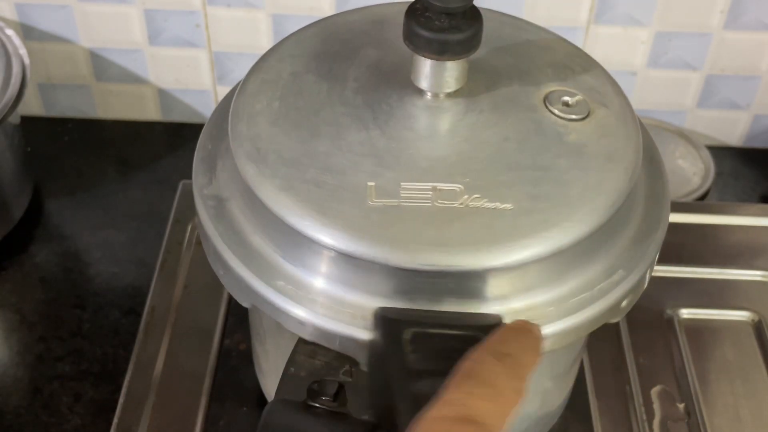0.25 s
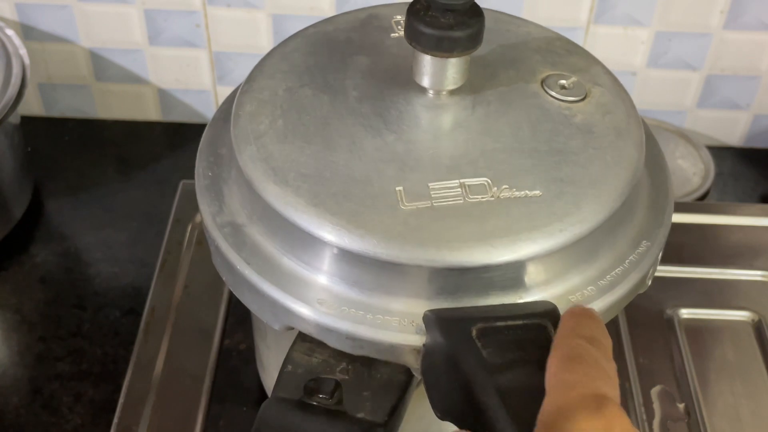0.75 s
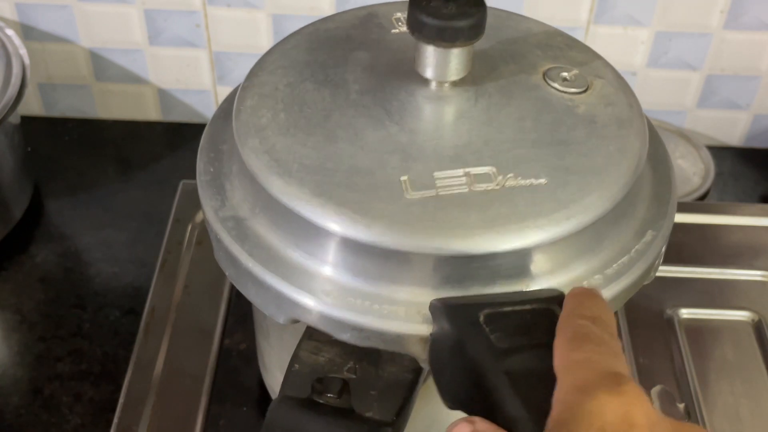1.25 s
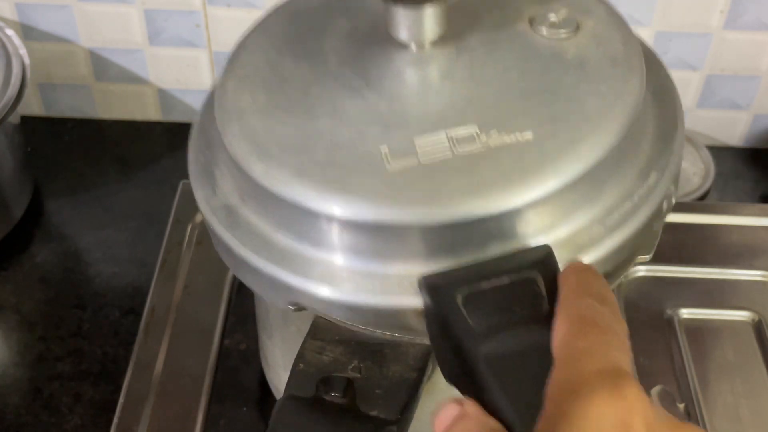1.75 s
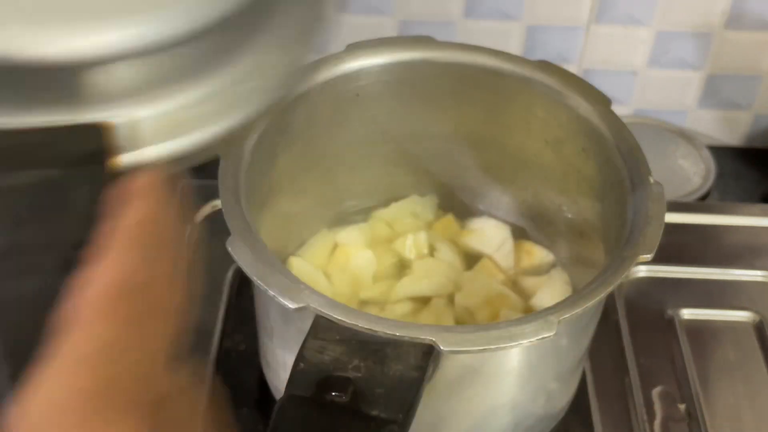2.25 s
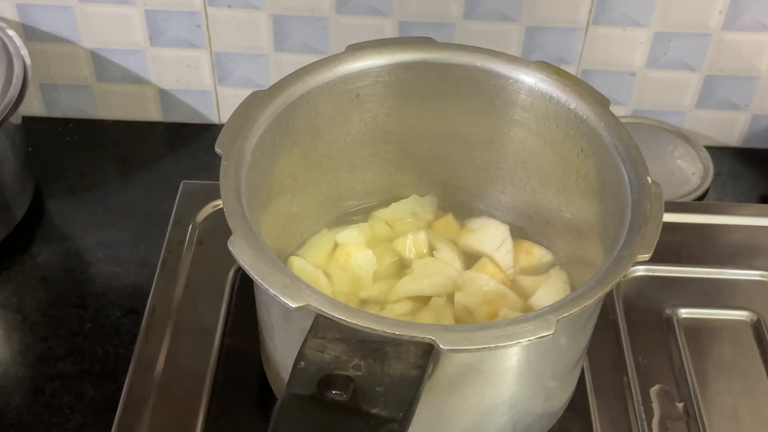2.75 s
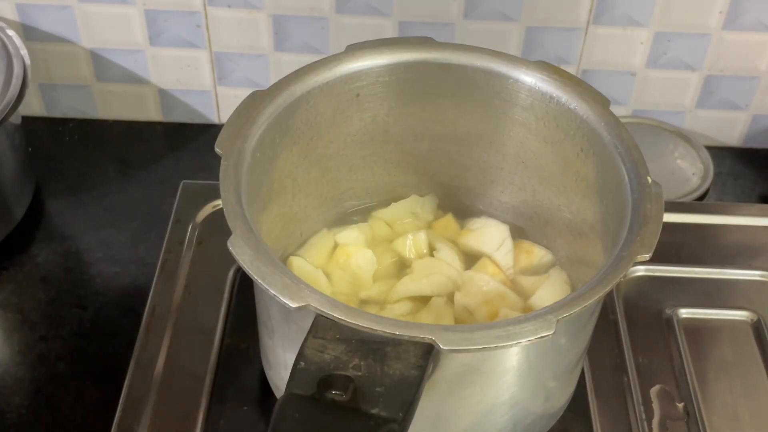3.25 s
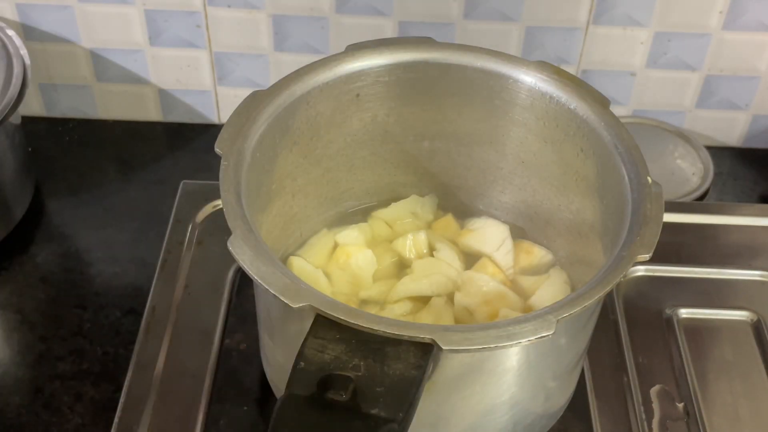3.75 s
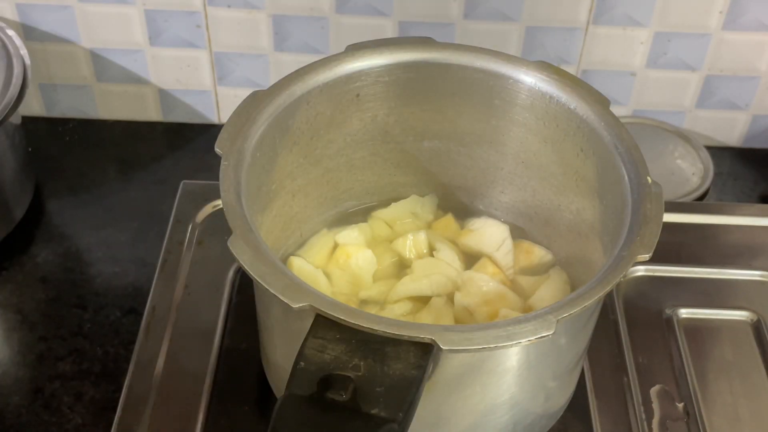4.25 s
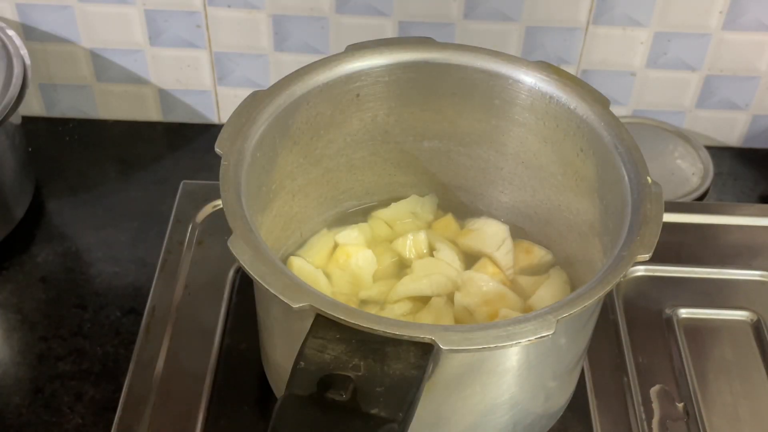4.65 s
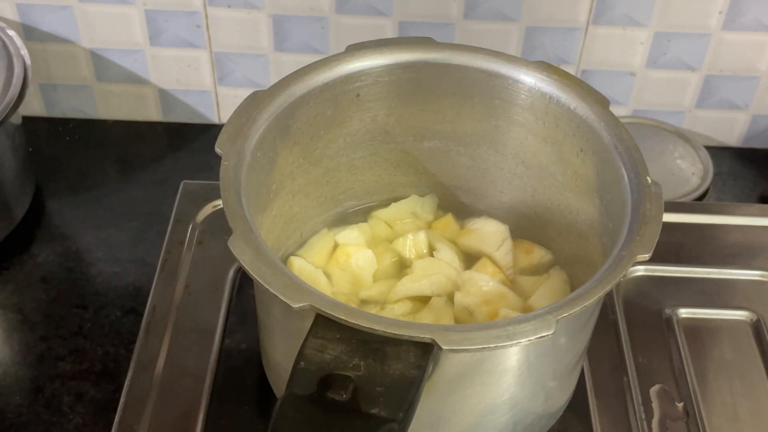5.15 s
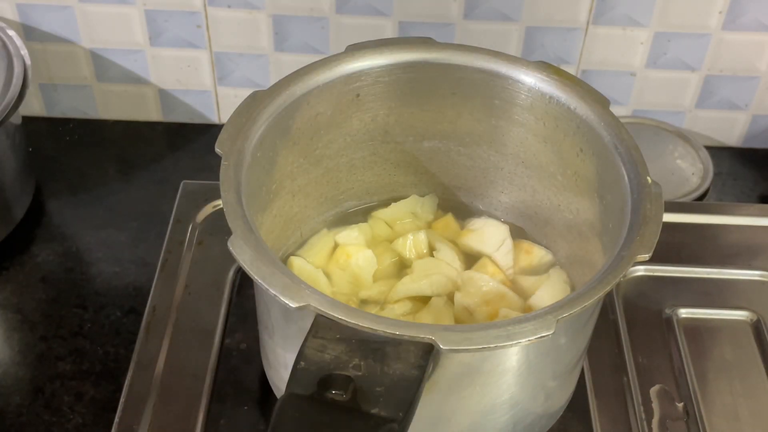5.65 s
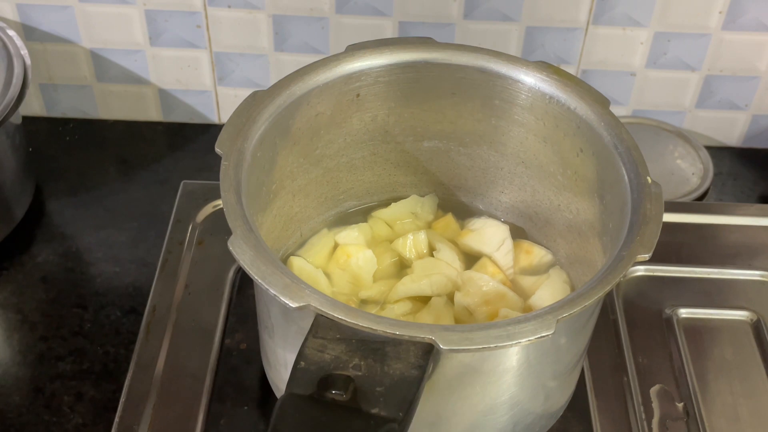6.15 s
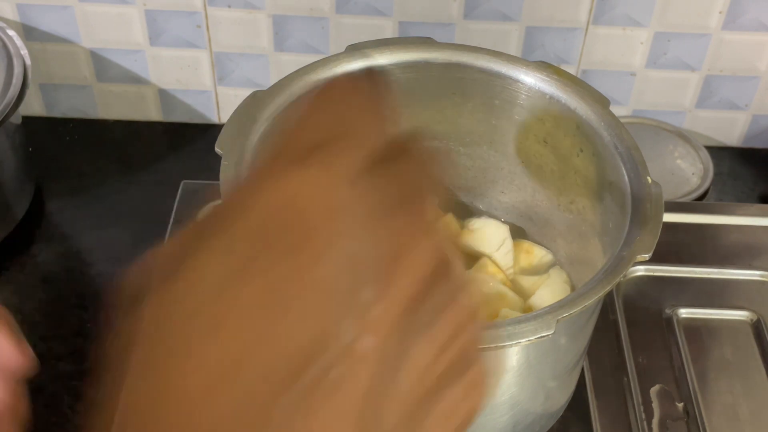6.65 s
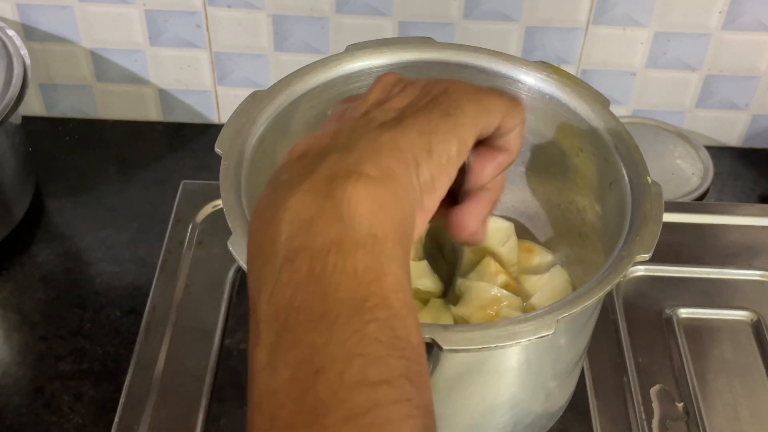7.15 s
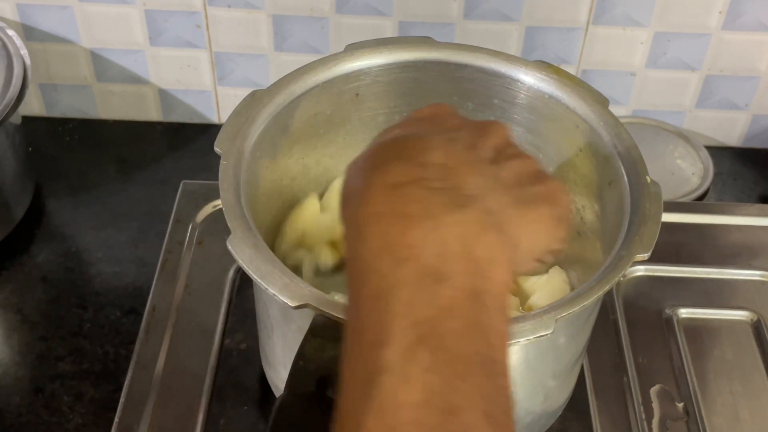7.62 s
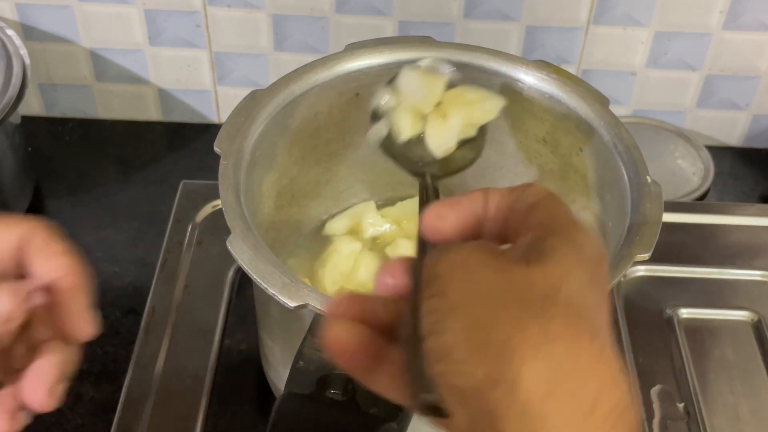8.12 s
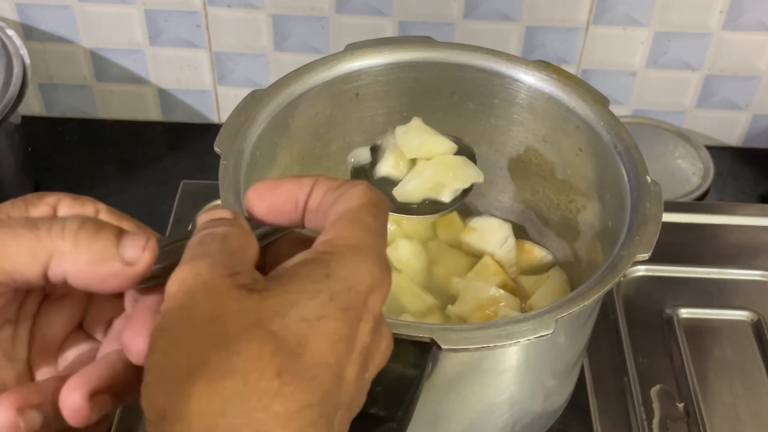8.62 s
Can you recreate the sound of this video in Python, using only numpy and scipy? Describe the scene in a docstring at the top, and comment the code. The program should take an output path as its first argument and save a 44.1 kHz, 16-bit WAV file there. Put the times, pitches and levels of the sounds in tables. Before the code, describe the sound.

Hollow thumps and sharp clicks of an aluminium lid, ringing clanks as it is set aside, then a spoon scraping up a pot wall.

```python
"""The aluminium lid of a pressure cooker clicks and thumps as it is twisted loose in a tiled kitchen.
It is lifted off, carried away and set down with a clatter. A steel spoon is then picked up with a clink,
knocks in the pot and scrapes up its wall. A blow is one impact plus chatter that rings the metal and the room,
a scrape is a dense run of tiny impacts, and a thump is a fading tone of the air under the lid.
Steady kitchen noise, soft low bumps and a thin hiss lie underneath."""
import sys
import numpy as np
from scipy import signal
from scipy.fft import rfft, irfft
from scipy.io import wavfile

SR = 44100
rng = np.random.default_rng(int(sys.argv[2]) if len(sys.argv) > 2 else 0)


def unload_audio(sound):
    """Save the sound as a 16-bit wav file, at the path given as the first command line argument."""
    columns = np.transpose(np.atleast_2d(sound))
    # keep every value between -1 and 1, then stretch to whole-number steps
    steps = np.round(np.clip(columns, -1, 1) * 32767)
    wavfile.write(sys.argv[1], SR, steps.astype(np.int16))


N = 391695
TIME = np.arange(N) / SR  # seconds into the scene
AGE = np.arange(int(.8 * SR)) / SR  # seconds since one sound began
ATTACK = int(.02 * SR)  # samples at the start of a blow over which its level is set

# edges of the five tone bands, thud, knock, clang, ting and sparkle: [edge_hz]
BAND_EDGES_HZ = (150, 500, 1900, 3700, 7800, 15000)

# In the four blow tables level_db is the clang, and knock_db is the knock relative to it.
# the lugs catch as the lid is twisted loose: [start_s, level_db, knock_db, chatter_s]
LID_CLICKS = [(0.064, -54, -9, 0.0024), (0.258, -49, 1, 0.0021), (0.438, -57, 10.5, 0.024),
              (0.524, -33, 2.5, 0.00069), (0.747, -61, 6.5, 0.048), (0.795, -49.5, 3, .012),
              (0.811, -34, 6, 0.0049), (0.826, -30.5, 1.5, 0.0081), (0.8385, -30.5, -29, 0.0059),
              (1.272, -53.5, 2, 0.041), (1.302, -45, 4.5, 0.011), (1.33, -52, 7, .008),
              (1.354, -44, -6, 0.0057), (1.375, -43, -3, 0.0015), (1.408, -48.5, 4, 0.0045),
              (1.469, -32.5, -13, 0.013), (1.551, -58.5, 4, 0.0023), (1.583, -63, 9.5, 0.0061),
              (1.717, -36, -11.5, 0.0045), (1.745, -47.5, 7.5, 0.0066), (1.762, -43.5, 3.5, 0.0014),
              (2.036, -76.5, 26, 0.039), (2.095, -43, -4, 0.0086)]
# the loose lid clanks as it is put down: [start_s, level_db, knock_db, chatter_s]
LID_CLANKS = [(2.549, -50.5, -3, 0.0017), (2.603, -47.5, -15.5, .005), (2.638, -45, -22.5, 0.0031),
              (2.646, -29.5, -24, 0.013), (2.665, -28, -21.5, 0.0059), (3.455, -56.5, -2, .012),
              (3.464, -40, -27, .0015), (3.474, -40, -26, .002), (3.58, -49.5, -14.5, 0.03),
              (3.918, -60.5, -6, 0.015), (4.01, -36.5, -11.5, 0.064), (4.095, -45.5, -11.5, 0.029),
              (4.192, -38, -12, 0.038), (4.294, -34, -2, 0.034), (4.313, -31.5, -13.5, 0.016),
              (4.392, -38.5, -11, 0.0023), (4.661, -35, -2.5, 0.0018)]
# the spoon clinks as it is picked up: [start_s, level_db, knock_db, chatter_s]
SPOON_CLINKS = [(4.881, -36, 3, 0.00096)]
# knocks against the food-damped pot: [start_s, level_db, knock_db, chatter_s]
POT_KNOCKS = [(6.852, -68.5, -0.5, 0.0011), (6.998, -48, 12, 0.0022), (7.222, -59.5, 8.5, 0.02),
              (7.313, -55, 9.5, 0.0012), (7.459, -54, 10, 0.019)]

# colour of each kind of blow: [thud_relative_to_knock_db, ting_relative_to_clang_db]
CLICK_COLOUR = (-4.3, -7.5)
CLANK_COLOUR = (-4.5, -4.5)
SPOON_COLOUR = (-19.5, -10.5)
POT_COLOUR = (-11, 3.45)
# sparkle relative to the ting: fades as the lid is twisted, brighter once it is loose: [time_s, level_db]
SPARKLE = [(.5, -10), (2.1, -21), (2.65, -10), (3.46, -8), (4.3, -5), (4.66, -0.5), (4.88, -7.5), (7, -2)]
# a blow above the medium level gains ting, one below it loses ting
MEDIUM_BLOW_DB, TING_PER_DB = -43.5, 0.418

# hollow thumps of the lid on its seal: [start_s, pitch_hz, peak_db, fade_by_60_db_s]
THUMPS = [(.811, 293.6, -22, 0.15), (.825, 197, -15, 0.1), (1.29, 320, -31.5, 0.12),
          (1.301, 213, -27.5, 0.049), (1.401, 263, -30.5, 0.085), (1.579, 245, -36, 0.1),
          (1.735, 306, -32.5, 0.13), (1.761, 437, -32, 0.19), (2.036, 232, -37, 0.23),
          (2.095, 398.7, -44.5, 0.087)]
THUMP_SWELL_S = 0.0024

# the lid drags over its resting place: [peak_time_s, peak_db, rise_by_20_db_s]
LID_DRAGS = [(4.36, -48, 0.069), (4.65, -51, 0.39)]
# the spoon digs in, then runs up the wall: [peak_time_s, peak_db, rise_by_20_db_s]
SPOON_SCRAPES = [(7.42, -44, 0.11), (7.675, -21, 0.093)]
DRAG_FALL_S, SCRAPE_FALL_S = 0.065, 0.043  # time to fall by 20 dB
# colour of each slide: [thud_db, knock_db, clang_db, ting_db]
DRAG_COLOUR = (-1.5, 2.5, -10, -14)
SCRAPE_COLOUR = (-22.5, -7.5, -7.5, -7.5)

# blows that land where one mode sings out: [start_s, pitch_hz, width_hz, peak_db, fade_by_60_db_s]
SINGING = [(.826, 1026, 61, -26.5, 0.097), (.826, 4520, 30, -48.5, 0.39), (2.665, 4470, 30, -39, 0.47),
           (2.665, 6694, 70.1, -27.5, 0.11), (2.665, 2960, 90.5, -28, 0.26),
           (3.464, 4460, 300, -25.5, 0.067), (3.474, 3366, 71, -25.5, 0.18), (3.58, 2300, 150, -43, 0.55),
           (4.01, 6060, 110, -37.5, 0.88), (4.325, 2160, 92, -18.5, 0.093), (4.325, 667, 40, -33.5, 0.14),
           (4.661, 817, 70, -26.5, 0.13), (4.881, 4530, 119, -36, 0.3), (7.678, 2123, 50, -32, 0.47),
           (7.678, 907, 30, -45.5, 0.22)]

# pitches at which each metal body rings: [pitch_hz, level_db]
LID_MODES = [(659, -6), (780, -4), (870, -4), (1006, -1), (1508, -7), (2113, -5), (2180, -6), (2256, -6),
             (2498, -7), (2579, -3), (2934, -2), (2972, -3), (3330, -3), (3370, -3), (3416, -7), (3962, -8),
             (4433, -8), (4505, -1), (5195, -5), (5984, 0), (6075, -8), (6422, -8), (6589, -3), (6637, -2),
             (6909, -7), (7313, -4), (7666, -7), (7948, -5), (9189, -4), (11313, -3), (12217, -3),
             (12874, -6)]
SPOON_MODES = [(1340, -4), (1723, 0), (1760, 0), (2047, -3), (2221, -2), (2326, -4), (2713, -5), (4409, -3),
               (4506, 0), (4613, -1), (7704, -5), (7940, -4)]
POT_MODES = [(260, -10), (530, -16), (724, -8), (945, -2), (1200, -14), (1507, -3), (2091, -11), (2134, -5),
             (2172, -9), (2272, -5), (2705, -11), (2945, -10), (3200, -11), (3720, -12), (4145, -3),
             (4196, -6), (4430, -5), (4910, -7), (5408, -14), (5467, -12)]

# the lid is carried away from the pot: [time_s, distance_m]
LID_DISTANCE = [(1.7, 0.17), (2.65, 0.37), (3.45, 0.61), (4.66, 0.69)]
ECHO_RADIUS_M = 0.63  # distance at which the lid's share of echo is 0 dB
# further shares of the echo: the metal's direct ring, and what it radiates in other directions
RING_ECHO_DB, SCATTER_DB = -6, 2

# colour of the steady kitchen noise: [pitch_hz, level_per_hz_db]
KITCHEN_COLOUR = [(53, -27.5), (90, -3), (135, -2.5), (262, 1.5), (366, -8.5), (448, -6), (751, -12),
                  (1050, -12.5), (1330, -19), (1850, -15.5), (3110, -28), (4670, -26.5), (7400, -33.5),
                  (9620, -56), (16300, -120)]
# the kitchen noise eases slowly at first, then drops near the end: [time_s, level_db]
KITCHEN_EASING = [(.1, 7), (2.4, 3.5), (7.95, 3.5), (8.1, -2), (8.88, -2.5)]
KITCHEN_DB, RUMBLE_DB = -64.5, -72.5  # both before the easing is added
# soft low bumps as hands and pot shift: [peak_time_s, peak_db, rise_by_20_db_s]
BUMPS = [(.1, -57, 0.22), (.27, -52.5, 0.17), (.6, -55, .2), (.85, -44, 0.062), (1.28, -49.5, 0.21),
         (1.6, -63, .1), (1.86, -53.5, 0.11), (2.31, -49.5, 0.13), (2.44, -53.5, .1), (3.43, -67.5, 0.089),
         (4.76, -54.5, 1), (6.92, -55, .2)]
BUMP_FALL_S = .3  # time to fall by 20 dB
HISS_DB, FIZZ_DB = -75, -82

# phase between the two microphone ports: [pitch_hz, left_lead_radians]
PORT_PHASE = [(0, 0), (6200, 0), (7400, -1.5), (8100, -3.05), (8800, -3.2), (9300, -4.1), (10600, -6.28),
              (12200, -6.28), (13900, -9.2), (16000, -9.4)]
TOP_HZ = 15800  # the treble is cut above this


def opening_lid(echo):
    """Lugs click against the lid while it shifts on its seal and thumps the air beneath."""
    glow = radiance(LID_MODES, width_hz=70, valley_db=-4)
    return blows(LID_CLICKS, CLICK_COLOUR, lid_metal(), glow, echo, ring_db=-15.5) + thumps(echo)


def putting_down_lid(echo):
    """The loose lid clanks and drags, ringing at its own pitches."""
    lid = lid_metal()
    glow = radiance(LID_MODES, width_hz=38, valley_db=-15)
    clanks = blows(LID_CLANKS, CLANK_COLOUR, lid, glow, echo, ring_db=-13.5)
    pressure = strokes(LID_DRAGS, DRAG_FALL_S)
    return clanks + slide(pressure, DRAG_COLOUR, lid, echo, ring_db=-1.5, room_db=-3.5, rate=740)


def lid_metal():
    """The thin lid rings long, with narrow clusters around its pitches."""
    return metal(LID_MODES, t60=0.46, line_hz=6.9, wash_hz=104, wash_db=-2, wash_s=0.0056)


def spoon_pickup(echo):
    """A blow rings the steel spoon."""
    spoon = metal(SPOON_MODES, t60=0.38, line_hz=61.7, wash_hz=706, wash_db=1, wash_s=0.009)
    glow = radiance(SPOON_MODES, width_hz=160, valley_db=-9.5)
    return blows(SPOON_CLINKS, SPOON_COLOUR, spoon, glow, echo, ring_db=-1, room_db=3)


def spoon_in_pot(echo):
    """The spoon knocks in the pot, then many tiny catches along its wall make the scrape."""
    pot = metal(POT_MODES, t60=.42, line_hz=50, wash_hz=345, wash_db=-3.5, wash_s=0.0057)
    scraped_pot = metal(POT_MODES, t60=0.47, line_hz=90, wash_hz=300, wash_db=-1, wash_s=0.0085)
    glow = radiance(POT_MODES, width_hz=120, valley_db=-9)
    knocks = blows(POT_KNOCKS, POT_COLOUR, pot, glow, echo, ring_db=-21.5, room_db=-7.5)
    pressure = strokes(SPOON_SCRAPES, SCRAPE_FALL_S)
    return knocks + slide(pressure, SCRAPE_COLOUR, scraped_pot, echo, ring_db=-5, room_db=-7.5,
                          rate=2900, sparkle_db=-10.5)


def blows(hits, colour_db, body, glow, echo, ring_db, room_db=None, chatter_db=-3, chatter_rate=1100):
    """One impact and dying chatter ring metal and room; without room_db the echo follows the lid's distance."""
    out = np.zeros((2, N))
    thud_db, ting_db = colour_db
    for start_s, level_db, knock_db, chatter_s in hits:
        dying = np.exp(-AGE / max(chatter_s, 1e-4))
        force = amp(chatter_db) * contacts(len(AGE), chatter_rate) * dying
        force[0] = 1  # the main impact
        direct = convolve(force, body(ring_db)[None])

        # sound thrown in other directions builds up in the room as the chatter dies
        wet_db = lid_room_db(start_s) if room_db is None else room_db
        scatter = irfft(rfft(kitchen_echo()) * glow, len(AGE))
        fade_out = np.minimum(1, 2 - 2 * AGE / AGE[-1]) ** 2
        scatter = scatter * np.sqrt(1 - dying ** 2) * fade_out
        scatter = unit(scatter) * np.sqrt(2 * np.sum(direct ** 2))
        sound = convolve(direct, space(echo, wet_db + RING_ECHO_DB))
        sound = sound + amp(wet_db + SCATTER_DB) * scatter

        extra_ting_db = TING_PER_DB * (level_db - MEDIUM_BLOW_DB)
        levels = level_db + np.array([knock_db + thud_db, knock_db, 0, ting_db + extra_ting_db])
        sparkle_db = np.interp(start_s, *np.transpose(SPARKLE))
        add(out, start_s, voice(sound, levels, ATTACK, sparkle_db))
    return out


def thumps(echo, room_db=-7):
    """The lid shifts on its rubber seal and the enclosed air booms as a fading tone."""
    out = np.zeros((2, N))
    for start_s, pitch_hz, peak_db, t60 in THUMPS:
        shape = (1 - np.exp(-AGE / THUMP_SWELL_S)) * fade(t60)
        boom = amp(peak_db) * shape / shape.max() * np.sin(2 * np.pi * pitch_hz * AGE)
        add(out, start_s, convolve(boom, space(echo, room_db)))
    return out


def slide(pressure, colour_db, body, echo, ring_db, room_db, rate, sparkle_db=-16):
    """Metal dragged over a surface: dense catches, as strong as the pressure."""
    response = convolve(body(ring_db), space(echo, room_db))
    response = voice(response, colour_db, len(AGE), sparkle_db) / np.sqrt(len(AGE))
    return convolve(level(contacts(N, rate), 0) * pressure, response)


def singing(echo, room_db=-2):
    """A close cluster of pitches beats as it dies away."""
    out = np.zeros((2, N))
    for start_s, pitch_hz, width_hz, peak_db, t60 in SINGING:
        noise = rng.standard_normal(len(AGE))
        cluster = irfft(rfft(noise) * resonances([(pitch_hz, 0)], width_hz), len(AGE))
        ring = convolve(cluster * fade(t60), space(echo, room_db))
        add(out, start_s, amp(peak_db) * ring / np.abs(ring).max())
    return out


def metal(modes, t60, line_hz, wash_hz, wash_db, wash_s, crack_s=0.00079):
    """Thin metal struck at a new spot on each call: a crack, a brief wash around the modes, a beating ring."""
    lines, humps = resonances(modes, line_hz), resonances(modes, wash_hz)

    def response(ring_db):
        """Noise shaped by the metal's pitches stands for the many ways it shakes."""
        crack, wash, ring = rng.standard_normal((3, len(AGE)))
        crack = crack * np.exp(-AGE / crack_s)
        wash = irfft(rfft(wash) * humps, len(AGE)) * np.exp(-AGE / wash_s)
        ring = irfft(rfft(ring) * lines, len(AGE)) * fade(t60)
        return unit(crack) + amp(wash_db) * unit(wash) + amp(ring_db) * unit(ring)
    return response


def resonances(modes, width_hz):
    """Gain over frequency of a set of modes, each a cluster so many Hz wide."""
    hz, db = np.transpose(modes)[:, :, None]
    freq = np.arange(len(AGE) // 2 + 1) * SR / len(AGE)
    peaks = amp(db) ** 2 / (1 + (2 * (freq - hz) / width_hz) ** 2) ** 1.5
    return np.sqrt(np.sum(peaks, axis=0))


def radiance(modes, width_hz, valley_db):
    """Colour that a metal body throws into the room: peaks at its modes over an even valley."""
    return np.hypot(resonances(modes, width_hz), amp(valley_db))


def contacts(size, rate):
    """Tiny random impacts, so many a second on average."""
    return (rng.random(size) < rate / SR) * rng.standard_normal(size)


def strokes(rows, fall_s):
    """Gain over time of strokes that each swell to a peak and die away."""
    power = 0
    for peak_s, peak_db, rise_s in rows:
        steps_from_peak = np.maximum((peak_s - TIME) / rise_s, (TIME - peak_s) / fall_s)
        power = power + amp(peak_db - 20 * steps_from_peak) ** 2
    return np.sqrt(power)


def voice(sound, colour_db, size, sparkle_db):
    """Set the thud, knock, clang and ting over the first samples; the sparkle follows the ting."""
    levels = [*colour_db, colour_db[-1] + sparkle_db]
    out = 0
    for lo, hi, db in zip(BAND_EDGES_HZ, BAND_EDGES_HZ[1:], levels):
        part = band(sound, lo, hi)
        out = out + part * amp(db) / np.sqrt(np.mean(part[:, :size] ** 2))
    return out


def kitchen_echo(t60_low=0.64, t60_high=0.42, build_s=0.0015, side_db=-2.0, wide_db=-13):
    """Diffuse echo of tiled walls: the treble dies first, and the middle register is the widest."""
    t60s = np.geomspace(t60_low, t60_high, len(BAND_EDGES_HZ) - 1)
    noise = rng.standard_normal((2, len(AGE)))
    tail = 0
    for lo, hi, t60 in zip(BAND_EDGES_HZ, BAND_EDGES_HZ[1:], t60s):
        tail = tail + band(noise, lo, hi) * amp(-60 * AGE / t60)
    mid, side = tail * (1 - np.exp(-AGE / build_s))
    side = amp(side_db) * band(side, 410, 2100, order=3) + amp(wide_db) * side
    return np.array([mid + side, mid - side]) / np.sqrt(np.sum(mid ** 2))


def space(echo, room_db):
    """Direct sound plus its share of echo."""
    response = amp(room_db) * echo
    response[:, 0] += 1
    return response


def lid_room_db(s):
    """The farther the lid, the larger its share of echo."""
    return 20 * np.log10(np.interp(s, *np.transpose(LID_DISTANCE)) / ECHO_RADIUS_M)


def background(side_db=-5, rumble_side_db=-15):
    """Shaped random noise: a steady kitchen, a soft handling rumble and a thin hiss with a fizzy top."""
    hz, db = np.transpose(KITCHEN_COLOUR)
    freq = np.arange(N // 2 + 1) * SR / N
    colour = amp(np.interp(np.log(freq + 1), np.log(hz), db))
    easing = curve(KITCHEN_EASING)
    mid, side = level(irfft(rfft(rng.standard_normal((2, N))) * colour, N), KITCHEN_DB)
    side = amp(side_db) * band(side, 380, 2100, order=2)
    kitchen = np.array([mid + side, mid - side]) * easing

    handling = np.hypot(strokes(BUMPS, BUMP_FALL_S), amp(RUMBLE_DB) * easing)
    low_noise = band(rng.standard_normal((2, N)), 50, 100, order=3)
    rumble, rumble_side = level(low_noise, 0) * handling
    rumble = rumble + amp(rumble_side_db) * np.array([rumble_side, -rumble_side])

    hiss = level(band(rng.standard_normal(N), 6000, 16000, order=2), HISS_DB)
    fizz = level(band(rng.standard_normal(N), 10400, 11200, order=2), FIZZ_DB)
    return kitchen + rumble + hiss + fizz


def amp(db):
    """Decibels to gain."""
    return 10 ** (np.asarray(db) / 20)


def unit(x):
    """Scale to an energy of one."""
    return x / np.sqrt(np.sum(x ** 2))


def level(x, db):
    """Scale to an rms (average) level."""
    return x * amp(db) / np.sqrt(np.mean(x ** 2))


def fade(t60):
    """Steady dying away, by 60 dB in t60 seconds."""
    return np.exp(-np.log(1000) * AGE / t60)


def curve(rows):
    """Gain over time from rows of time_s, level_db."""
    return amp(np.interp(TIME, *np.transpose(rows)))


def band(x, lo_hz, hi_hz, order=5):
    """Keep only the pitches between two edges."""
    edges = [lo_hz, min(hi_hz, .45 * SR)]
    return signal.sosfilt(signal.butter(order, edges, "band", fs=SR, output="sos"), x + 1e-18)


def convolve(x, response):
    """Pass x through a one- or two-channel response, keeping its length."""
    return signal.fftconvolve(np.atleast_2d(x), response, axes=1)[:, :x.shape[-1]]


def add(out, s, sound):
    """Mix a sound in at time s."""
    start = int(s * SR)
    out[:, start:start + sound.shape[1]] += sound[:, :N - start]


def scene():
    """Lid, spoon and pot in one kitchen."""
    echo = kitchen_echo()
    lid = opening_lid(echo) + putting_down_lid(echo)
    spoon = spoon_pickup(echo) + spoon_in_pot(echo)
    return lid + spoon + singing(echo) + background()


def record(dry, left_db=0.12, dull_hz=13000):
    """The two microphone ports drift apart in phase in the treble; the top is rounded and cut."""
    freq = np.arange(N // 2 + 1) * SR / N
    sides = np.array([[1], [-1]])  # left, right
    phase = np.interp(freq, *np.transpose(PORT_PHASE))
    ports = amp(left_db * sides) * np.exp(.5j * sides * phase)
    rounding = 1 / np.sqrt(1 + (freq / dull_hz) ** 10)
    rounded = irfft(rfft(dry) * ports * rounding, N)
    return signal.sosfilt(signal.ellip(8, .2, 70, TOP_HZ, fs=SR, output="sos"), rounded)


dry = scene()
out = record(dry)
unload_audio(out)
```